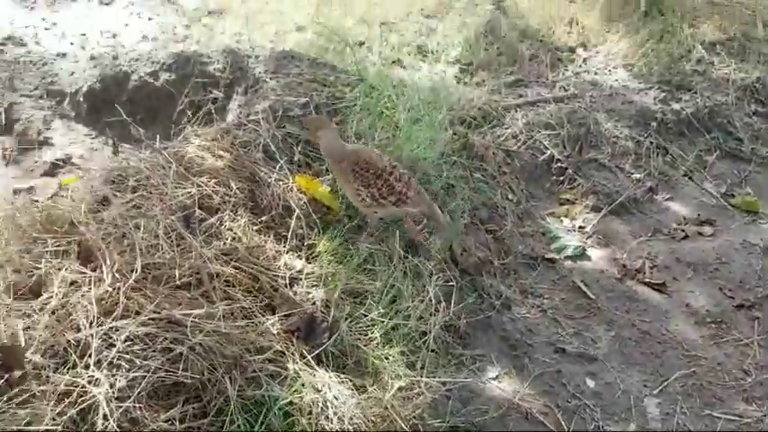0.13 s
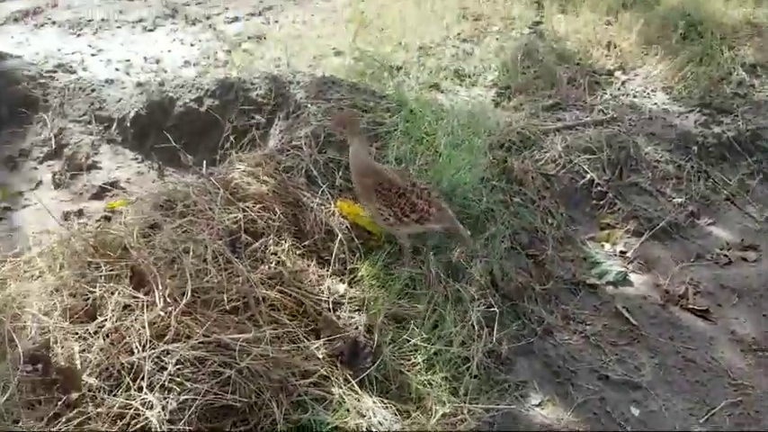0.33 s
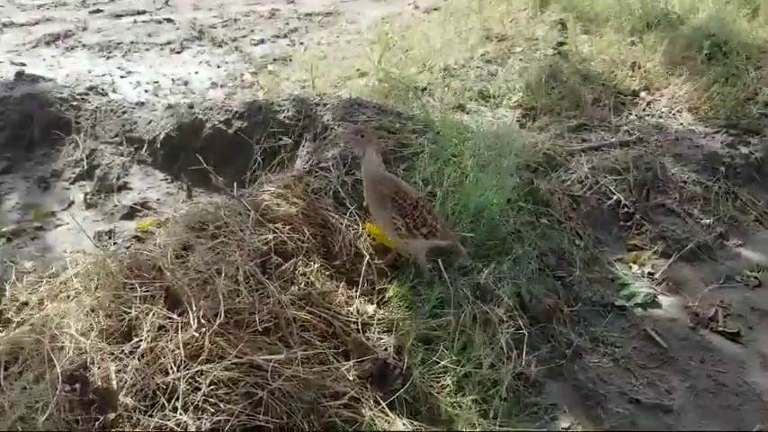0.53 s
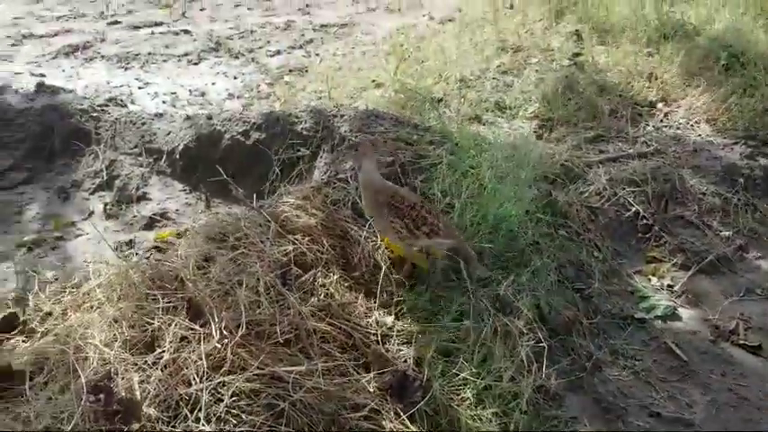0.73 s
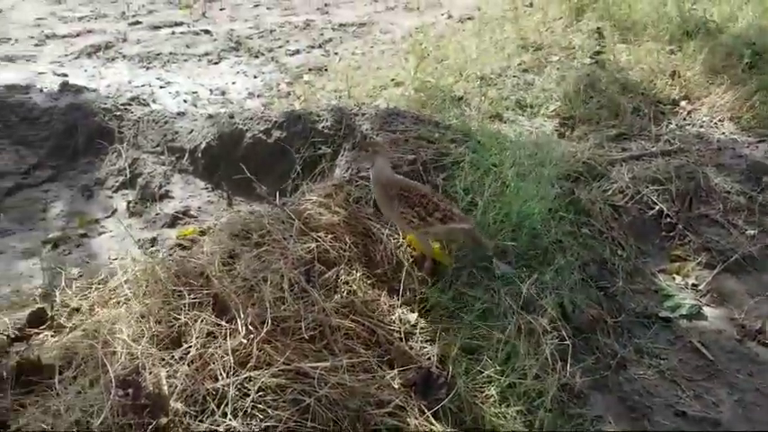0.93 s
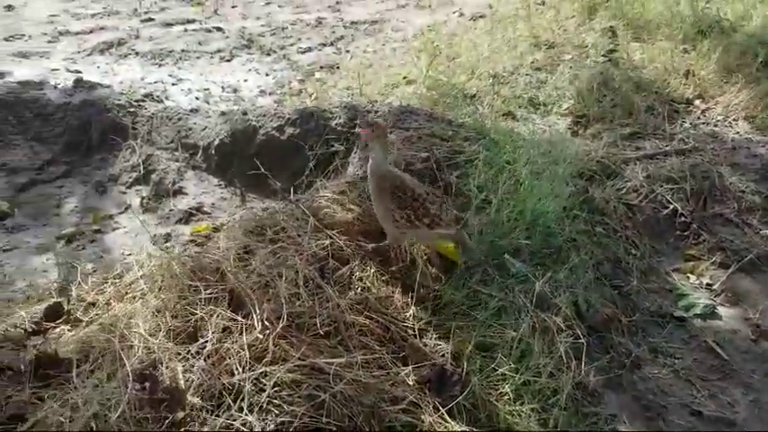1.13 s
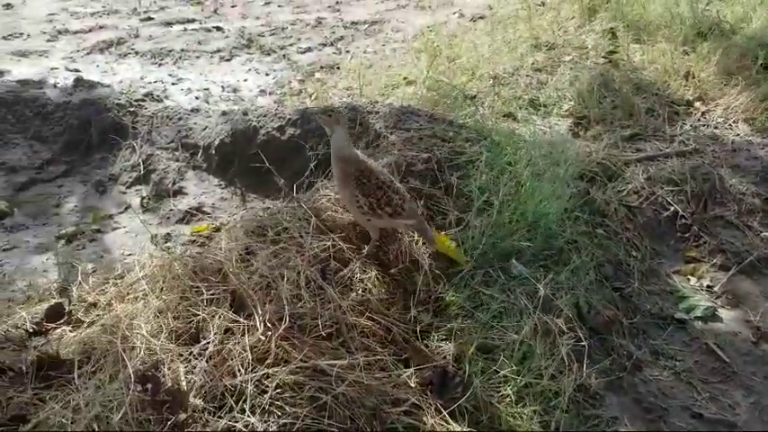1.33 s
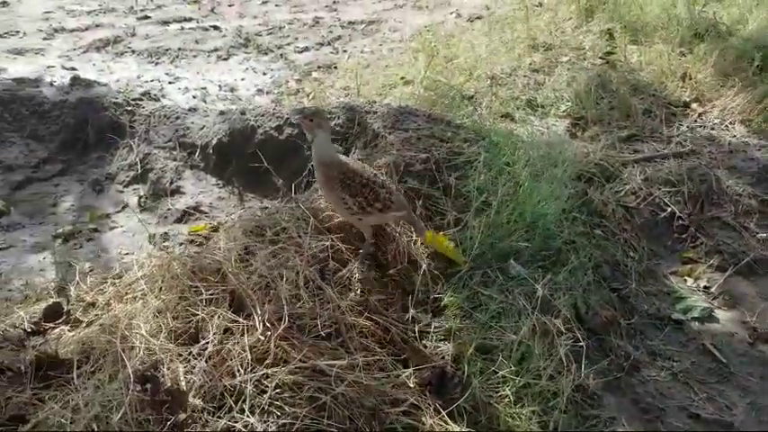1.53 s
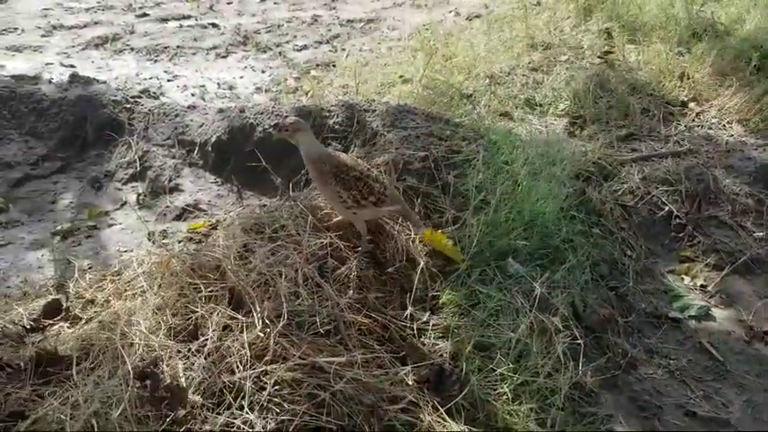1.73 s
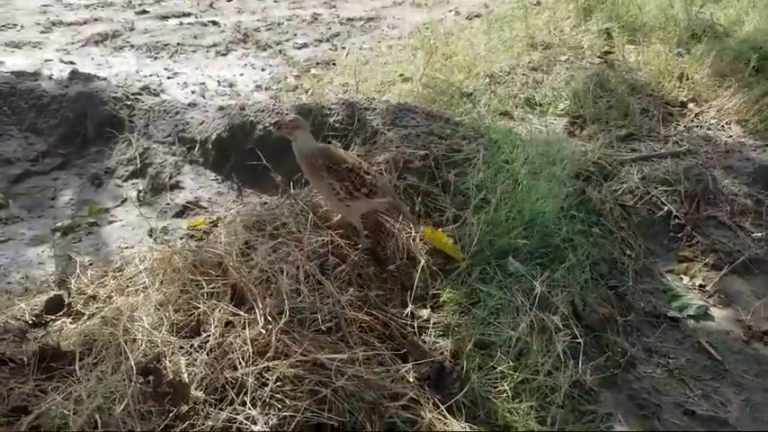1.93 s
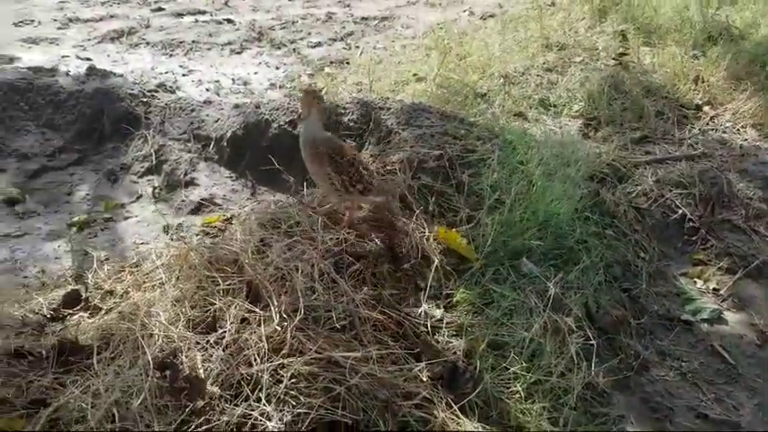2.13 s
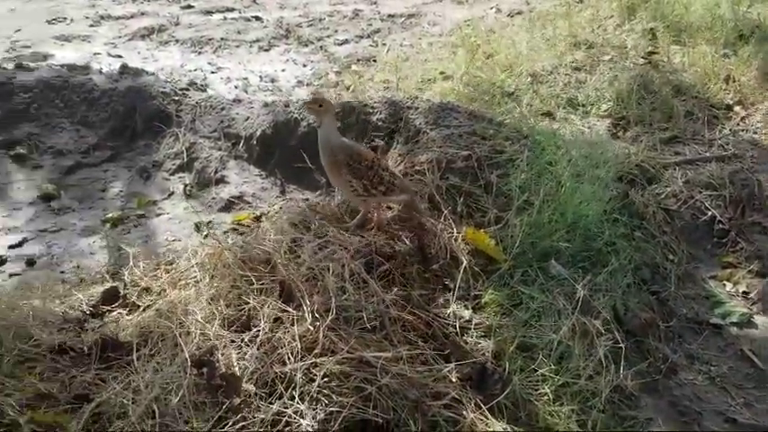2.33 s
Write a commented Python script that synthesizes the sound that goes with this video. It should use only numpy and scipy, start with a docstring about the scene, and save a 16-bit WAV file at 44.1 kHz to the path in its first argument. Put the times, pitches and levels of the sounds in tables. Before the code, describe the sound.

A francolin calls loudly, close to the microphone in an open field. Each of three phrases starts with a shrill whistle, breaks into three rasping notes and trails off in clucks. Dry straw snaps briefly over faint air rumble.

```python
"""Over a light rumble of air comes a low throat pop, then a shrill whistle: a francolin is calling
close by, from a heap of straw at the edge of a field. Each of its three phrases breaks into three
rasping notes and trails off in ever softer, duller clucks. The whistle is a nearly pure tone; rasps
and clucks are membrane pulses shaped by the resonances of the throat. A few steps sound in the dry
straw, which scatters the call, and the field adds a faint tail."""
import sys
import numpy as np
from scipy import signal
from scipy.fft import rfft, irfft
from scipy.io import wavfile
from scipy.ndimage import uniform_filter1d, minimum_filter1d

SR = 44100
rng = np.random.default_rng(int(sys.argv[2]) if len(sys.argv) > 2 else 0)


def file_out(sig):
    """Save sig as 16-bit WAV at sys.argv[1]."""
    # one column per channel
    cols = np.atleast_2d(sig).T
    # limit, then scale
    lim = np.clip(cols, -1, 1)
    pcm = np.round(lim * 32767).astype(np.int16)
    wavfile.write(sys.argv[1], SR, pcm)


N = 105840
T = np.arange(N) / SR
CUTOFF_HZ = 15700


def from_db(db):
    """Amplitude ratio of a level in decibels."""
    return 10 ** (np.asarray(db) / 20)


def rms_one(x):
    """Normalisation to unit rms."""
    return x / np.sqrt(np.mean(x ** 2) + 1e-20)


def at_hz(points, hz):
    """Interpolation of (Hz, dB) points on a log-frequency axis."""
    f, db = np.transpose(points)
    return np.interp(np.log(np.maximum(hz, 1)), np.log(f), db)


def colour(x, points):
    """Zero-phase filtering by a response of (Hz, dB) points."""
    n = x.shape[-1]
    gain = from_db(at_hz(points, np.fft.rfftfreq(2 * n, 1 / SR)))
    return irfft(rfft(x, 2 * n) * gain)[..., :n]


def drift(rate_hz):
    """Random modulation: noise low-passed at rate_hz, with unit rms."""
    r = np.exp(-2 * np.pi * rate_hz / SR)
    return rms_one(signal.lfilter([1], [1, -2 * r, r * r], rng.standard_normal(N)))


def phase_of(hz):
    """Phase as the time integral of frequency."""
    return 2 * np.pi * np.cumsum(hz) / SR


def gate(start, end, attack, release):
    """An envelope with sine-squared edges; times in seconds."""
    opening = np.sin(np.pi / 2 * np.clip((T - start) / attack, 0, 1)) ** 2
    closing = np.sin(np.pi / 2 * np.clip((end - T) / release, 0, 1)) ** 2
    return opening * closing


def bell(t, width):
    """A Gaussian envelope centred on t = 0."""
    return np.exp(-.5 * (t / width) ** 2)


def pan(x, db):
    """Placement by interaural level difference, left minus right."""
    return x * from_db(np.array([[db], [-db]]) / 2)


def stereo_noise(spectrum, side_db=-8):
    """Partial coherence: coloured noise mostly alike at both ears, with unit rms."""
    mid, side = rng.standard_normal((2, N))
    return rms_one(colour(mid + from_db(side_db) * side * np.array([[1], [-1]]), spectrum))


def air(hiss_db=-72):
    """Broadband noise of light air: a steady hiss and a low rumble that swells and fades."""
    # Each row: frequency in Hz, relative level in dB.
    hiss_spectrum = [(30, -11.5), (200, -4.5), (500, -4.5), (1400, -8), (2500, -11), (6000, -19.5),
                     (8500, -11), (15000, -19)]
    rumble_spectrum = [(20, -26), (45, -8), (80, -5), (130, -14), (250, -24.5), (600, -45), (3000, -73.5)]
    # Each row: time in seconds, rumble level in dB.
    rumble_levels = [(0, -63.5), (.3, -58.5), (.8, -62), (1.2, -58), (1.65, -65), (1.9, -74), (2.4, -81)]
    swell = from_db(np.interp(T, *np.transpose(rumble_levels)))
    return from_db(hiss_db) * stereo_noise(hiss_spectrum) + swell * stereo_noise(rumble_spectrum)


def pops(width_s=.0075, fall_oct_per_s=34, octave_db=-17, edge_db=-17):
    """A falling glide under a Gaussian envelope: the rough-edged grunt before each whistle."""
    # Each row: peak time in seconds, level in dB, pitch in Hz.
    grunts = [(.183, -34, 214.4), (0.964, -34.5, 201.2), (1.809, -41.5, 232)]
    edge_spectrum = [(200, -15.5), (900, -15), (1400, -2.5), (2100, -24), (3600, -11),
                     (6000, -26.5), (15000, -41.5)]
    edge = from_db(edge_db) * rms_one(colour(rng.standard_normal(N), edge_spectrum))
    out = 0
    for s, db, hz in grunts:
        phase = phase_of(hz * 2 ** (-fall_oct_per_s * np.clip(T - s, -.03, .03)))
        wave = np.sin(phase) + from_db(octave_db) * np.cos(2 * phase)
        tone = np.sqrt(2) * wave * bell(T - s, width_s)
        out += from_db(db) * (tone + edge) * gate(s - .012, s + .014, .0055, .0033)
    return out


def whistles(jitter=.001, hiss_db=-21.5, beat_swing_db=-2.5):
    """Beating: a near sine swoops up and holds while a weak second voice interferes with it."""
    # One contour per whistle. Each row: time in seconds, pitch in Hz, level in dB.
    contours = [
        [(.190, 3067, -44), (.197, 3648, -19), (.205, 3726, -10.5), (.218, 3840, -13), (.254, 3871, -14.5),
         (.276, 3780, -23.5), (.308, 3805, -14.5), (.334, 3770, -17), (.349, 3864, -46.5)],
        [(.974, 3496, -31.5), (.989, 3812, -10.5), (1.009, 3911, -11), (1.033, 3957, -14), (1.062, 3963, -13),
         (1.085, 3971, -15), (1.118, 3965, -14.5), (1.135, 3930, -19), (1.149, 3905, -22)],
        [(1.820, 3257, -42), (1.834, 3860, -13.5), (1.848, 4050, -16), (1.864, 4272, -15.5), (1.924, 4296, -13),
         (1.95, 4216, -19), (1.975, 4290, -19), (1.998, 4230, -27), (2.013, 4257, -41)],
    ]
    # Each row: second voice's offset in Hz and level in dB, pan in dB, first voice's octave in dB.
    voicings = [(281, -41, -1.5, -42), (244.5, -29.5, -0.5, -36), (-290, -34, 4, -26)]
    # Each row: frequency in Hz, relative level of the hiss in dB.
    hiss_spectrum = [(300, -34), (1300, -15.5), (2800, -18.5), (3900, 4), (5200, -12), (6800, -23),
                     (8500, -17.5), (12500, -20), (13800, -12.5), (16000, -17.5)]
    hiss = from_db(hiss_db) * rms_one(colour(rng.standard_normal((2, N)), hiss_spectrum))
    out = 0
    for contour, (apart_hz, second_db, pan_db, octave_db) in zip(contours, voicings):
        s, hz, db = np.transpose(contour)
        pitch = np.interp(T, s, hz) * (1 + jitter * drift(53))
        phase = phase_of(pitch)
        level = from_db(np.interp(T, s, db)) * gate(s[0], s[-1], .0042, .0024)
        first = level * (np.sin(phase) + from_db(octave_db) * np.sin(2 * phase))
        second = np.sin(phase_of(pitch + apart_hz + 25 * drift(41)))
        second *= from_db(second_db + beat_swing_db * np.tanh(drift(27))) * gate(s[0], s[-1], .079, .01)
        out += pan(np.sqrt(2) * (first + second) + level * hiss, pan_db)
    return out


def rough_pulses(phase, noise, harmonics):
    """Voiced excitation: one membrane pulse and a puff of noise in each cycle, with unit rms."""
    pulses = np.cos(np.arange(1, harmonics + 1)[:, None] * phase).sum(axis=0)
    puffs = rng.standard_normal(len(phase)) * (1 + np.cos(phase))
    return rms_one(rms_one(pulses) + noise * rms_one(puffs))


def rasps(pulse_hz=980.5, jitter=.045, noise_db=-4):
    """Source and filter: irregular pulses ring in the throat, under and between the notes."""
    # One envelope per phrase. Each row: time in seconds, level in dB.
    envelopes = [
        [(.386, -21.5), (.393, -34.5), (.411, -19), (.420, -28.5), (.437, -29), (.446, -36), (.474, -60),
         (.484, -12.5), (.501, -33), (.513, -18), (.524, -32.5), (.540, -31)],
        [(1.146, -12.5), (1.160, -48), (1.176, -21.5), (1.183, -24), (1.197, -23.5), (1.208, -22), (1.226, -66),
         (1.240, -22.5), (1.253, -24), (1.262, -41), (1.285, -27), (1.302, -37.5)],
        [(2.029, -10), (2.035, -33), (2.052, -20.5), (2.064, -34.5), (2.078, -22.5), (2.098, -72),
         (2.114, -19.5), (2.127, -37), (2.136, -21.5), (2.153, -34.5), (2.172, -38.5)],
    ]
    # Each row: frequency in Hz, relative gain of the throat in dB.
    throat = [(400, -54), (750, -21), (980, -14), (1350, -16), (1900, -11), (2300, 3.5), (2900, -1.5),
              (3350, -3), (4000, -3.5), (4600, -5), (5700, -5.5), (6800, -29.5), (9500, -9.5),
              (13500, -26.5), (16000, -30.5)]
    phase = phase_of(pulse_hz * (1 + jitter * drift(180)))
    voice = rms_one(colour(rough_pulses(phase, from_db(noise_db), harmonics=15), throat))
    out = 0
    for envelope in envelopes:
        s, db = np.transpose(envelope)
        out += voice * from_db(np.interp(T, s, db)) * gate(s[0], s[-1], .01, .0093)
    return out


def notes(jitter=.004, shimmer_db=2.06, flip_share=.3, flip_s=.002, lock_hz=1990):
    """Period doubling: where every other cycle of a bright note is weak, half-pitch tones appear."""
    # Each row: start and end in seconds; first, middle and last pitch in Hz; then, in dB, level,
    # half-pitch tone gain, overtone gain below 6 kHz, overtone gain above 8 kHz and pan.
    chatter = [ (0.389, 0.413, 1937, 1850, 1743, -27.5, 10, 17, -3.5, -2),
               (0.438, 0.461, 1815, 1921, 2074, -18.5, 2.5, 4.5, -8, -2.5),
               (0.455, 0.486, 1937, 2040, 2000, -13.5, -22, 12, 3, 5),
               (0.503, 0.523, 1962, 1865, 1700, -15, -9.5, 5, -25.5, -0.5),
               (1.155, 1.186, 1634, 1914, 1953, -21.5, 2, 17, -3.5, -1.5),
               (1.204, 1.242, 2039, 2054, 1978, -15.5, -20.5, 14.5, 4.5, 4.5),
               (1.258, 1.284, 2082, 1938, 1650, -15.5, -28, 6.5, -2.5, -1.5),
               (2.037, 2.053, 1999, 1943, 1870, -26.5, 8, -8, -2, -3.5),
               (2.074, 2.113, 2123, 2083, 2055, -14, -32, 4, 3.5, 4),
               (2.132, 2.153, 2060, 1920, 1640, -17.5, -28, -13, -6, 3)]
    # Each row: frequency in Hz, level in dB of odd multiples of half the pitch.
    half_tones = [(950, -23), (2850, -7), (4800, -16), (6500, -27.5), (9000, -59.5), (15000, -40.5)]
    # Each row: frequency in Hz, overtone level in dB.
    overtones = [(3600, -14), (4100, -13.5), (6000, -22), (8100, -13.5), (10200, -13.5), (12400, -19.5),
                 (14200, -12), (16000, -55)]
    out = np.zeros((2, N))
    for start, end, hz0, hz1, hz2, db, half_db, over_db, treble_db, pan_db in chatter:
        on = (T > start) & (T < end)
        progress = (T[on] - start) / (end - start)
        arch = np.polyval(np.polyfit([0, .5, 1], [hz0, hz1, hz2], 2), progress)
        final_drop = 1 - flip_share * np.exp((T[on] - end) / flip_s)
        pitch = arch * (1 + jitter * drift(200)[on]) * final_drop
        jitter_rad = .08 if hz1 > lock_hz else .2  # ragged below the locking pitch
        phase = phase_of(pitch) + jitter_rad * drift(900)[on]
        doubling_db = half_db + 2 * drift(67)[on]
        wave = np.cos(phase)
        for k in range(1, 18):
            hz = k * pitch / 2
            angle = k * phase / 2 - np.pi * (k / 7) ** 2  # phase offsets spread each pulse
            if k % 2:
                wave += from_db(at_hz(half_tones, hz) + doubling_db) * np.cos(angle)
            elif k > 2:
                bright_db = at_hz([(6000, over_db), (8000, treble_db)], hz)
                wave += from_db(at_hz(overtones, hz) + bright_db) * np.cos(angle)
        level = from_db(db + shimmer_db * drift(61)[on]) * gate(start, end, .005, .006)[on]
        out[:, on] += pan(np.sqrt(2) * wave * level, pan_db)
    return colour(out, [(300, -30), (750, 0)])


def steps(snap_s=.0016, thud_s=.016):
    """Fracture and impact: a foot snaps a dry stalk or lands with a soft thud."""
    # Each row: time in seconds, snap level in dB, thud level in dB.
    footfalls = [(0.584, -31, -91), (0.612, -33, -81.5), (1.607, -68, -57.5)]
    snap = rms_one(colour(rng.standard_normal(N), [(500, -39), (4000, 1.5), (15000, 6)]))
    thud_spectrum = [(60, -7), (140, -19), (400, -11.5), (900, -31), (4000, -48)]
    thud = rms_one(colour(rng.standard_normal(N), thud_spectrum))
    out = 0
    for s, snap_db, thud_db in footfalls:
        out += from_db(snap_db) * snap * (T > s) * np.exp(-np.abs(T - s) / snap_s)
        out += from_db(thud_db) * thud * bell(T - s, thud_s)
    return out


def clucks(fall_oct_per_s=8.9, tone_s=.011, swell_s=.0067, lead_s=.029, lead_db=-10):
    """Formant filtering: falling nasal pulse trains start softly, then swell with one strong harmonic."""
    # Each row: peak time in seconds, pulse rate in Hz, tone level in dB, pulse train level in dB,
    # tilt in dB per octave, treble gain in dB, roughness as a noise ratio, harmonic number of the tone.
    calls = [ (0.679, 603, -32, -31.5, 1.5, 0.5, 0.75, 3), (0.783, 437, -39.5, -38, -4, -11, 0.63, 3),
             (0.881, 394, -42.5, -45.5, -7.5, -11.5, 0.93, 3), (1.431, 827.5, -25.5, -26, 8, 3.5, 0.62, 2),
             (1.538, 574.8, -35.5, -31.5, 2, 2, 1.12, 3), (1.64, 418.5, -35, -39, 0, -1, 0.84, 3),
             (1.748, 423, -38.5, -46.5, -6.5, -21, .5, 3), (2.296, 841.4, -24.5, -25, 6, 6.5, 0.39, 2),
             (2.403, 617, -33.5, -33, 1.5, -1, 0.72, 3)]
    # Each row: frequency in Hz, relative gain of the throat in dB.
    formants = [(300, -15), (550, -19.5), (850, -4), (1220, 2), (1500, -9.5), (1830, 7), (2300, -16),
                (2880, -7.5), (3450, -21), (4100, -19), (4700, -19.5), (5600, -20), (7000, -38),
                (12000, -30.5), (16000, -44.5)]
    out = np.zeros(N)
    for s, hz, tone_db, train_db, tilt_db, treble_db, roughness, harmonic in calls:
        on = np.abs(T - s) < .05
        t = T[on] - s
        wobble = .1 * roughness * drift(250)[on]
        pitch = hz * 2 ** (-fall_oct_per_s * t)
        tone = np.sqrt(2) * np.sin(harmonic * phase_of(pitch * (1 + wobble / 2)))
        tone *= bell(t, tone_s) * gate(s - tone_s, s + .03, .0021, .019)[on]
        throat = [(f, db + tilt_db * np.log2(np.clip(f, 900, 4000) / 1500) + treble_db * (f > 6000))
                  for f, db in formants]
        pulses = rough_pulses(phase_of(pitch * (1 + wobble)), roughness, int(CUTOFF_HZ / hz))
        train = rms_one(colour(pulses, throat))
        swell = (bell(t, swell_s) + from_db(lead_db)) * gate(s - lead_s, s + .03, .003, .019)[on]
        out[on] += from_db(tone_db) * tone + from_db(train_db) * train * swell / swell.max()
    return out


def direct_path(bird, right_lag_s=.000063):
    """Interaural differences: the bird is louder at the right ear and slightly earlier at the left."""
    # Each row: frequency in Hz, left minus right in dB.
    balance = [(200, -3.5), (1000, -2.5), (2000, -2), (2900, -5.5), (3900, -11), (5500, -11.5), (8000, -2),
               (14000, -7)]
    left_gains = [(hz, 2 / (1 + from_db(-db))) for hz, db in balance]
    left = colour(bird[0], [(hz, 20 * np.log10(g)) for hz, g in left_gains])
    right = colour(bird[1], [(hz, 20 * np.log10(2 - g)) for hz, g in left_gains])
    return np.array([left, np.interp(T - right_lag_s, T, right)])


def scatter(bird, t60_s):
    """Diffuse reflection: a tail that decays exponentially, different at each ear."""
    # Each row: frequency in Hz, gain of the scattered sound in dB.
    response = [(200, -6.5), (1800, 8), (3400, 11.5), (3900, 2), (5500, 13.5), (8000, 4), (15000, 10)]
    mono = colour(bird.mean(axis=0), response)
    envelope = from_db(-60 * T[:SR] / t60_s) * np.clip(T[:SR] / .016, 0, 1)
    tail = rng.standard_normal((2, SR)) * envelope
    tail /= np.sqrt(np.sum(tail ** 2) / 2)
    return signal.fftconvolve(mono[None], tail, axes=1)[:, :N]


def scene():
    """Superposition of the bird, its scatter from straw and field, and the air."""
    bird = whistles() + notes() + rasps() + clucks() + pops() + steps()
    straw = from_db(-19) * scatter(bird, t60_s=.07)
    field = from_db(-37.5) * scatter(bird, t60_s=.54)
    return direct_path(bird) + straw + field + air()


def record(dry):
    """Band and peak limiting: the top is cut, and a fast limiter holds peaks under full scale."""
    x = colour(dry, [(CUTOFF_HZ - 400, 0), (CUTOFF_HZ, -20), (CUTOFF_HZ + 500, -90)])
    safe_gain = np.minimum(1, .97 / (np.abs(x).max(axis=0) + 1e-9))
    return x * uniform_filter1d(minimum_filter1d(safe_gain, size=177), size=133)


dry = scene()
out = record(dry)
file_out(out)
```